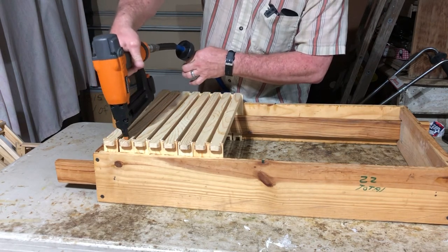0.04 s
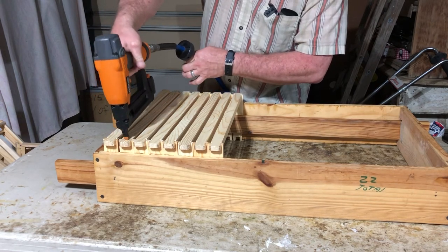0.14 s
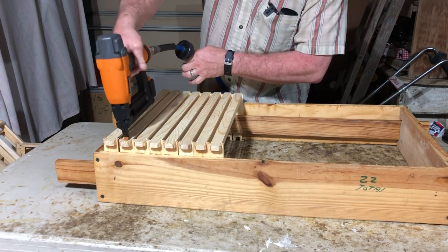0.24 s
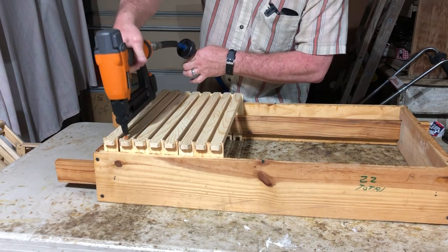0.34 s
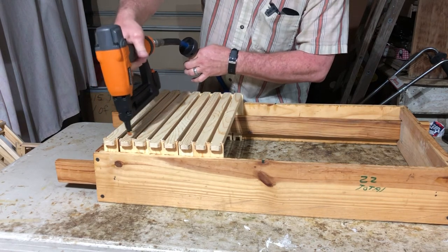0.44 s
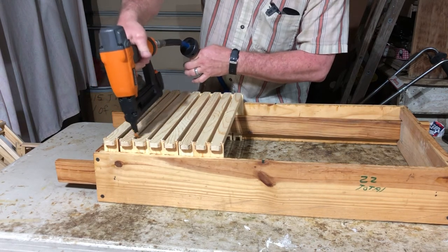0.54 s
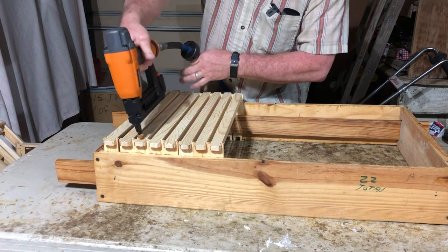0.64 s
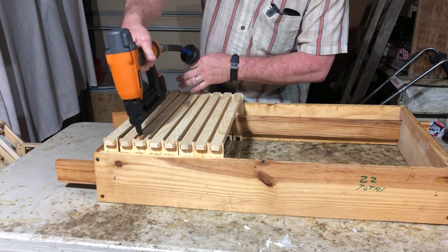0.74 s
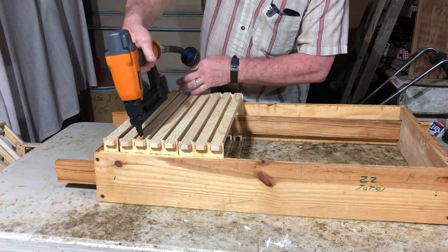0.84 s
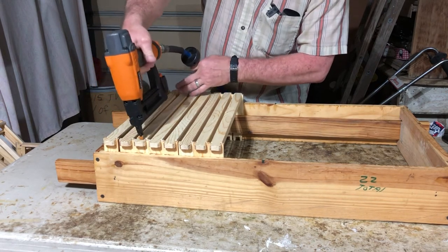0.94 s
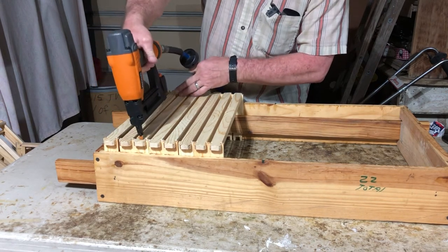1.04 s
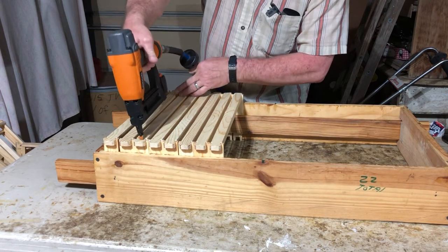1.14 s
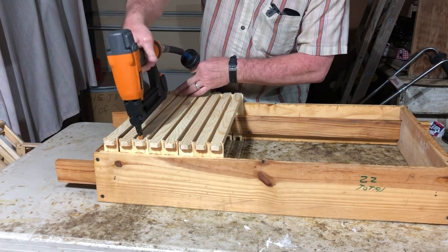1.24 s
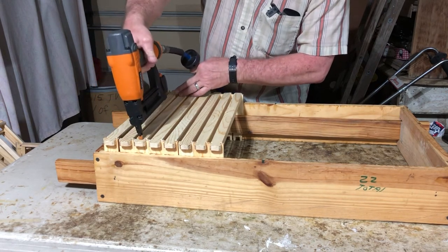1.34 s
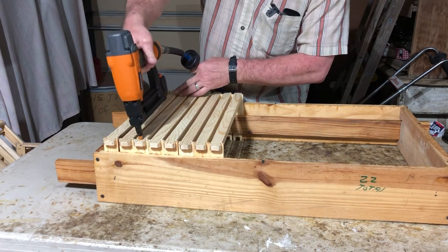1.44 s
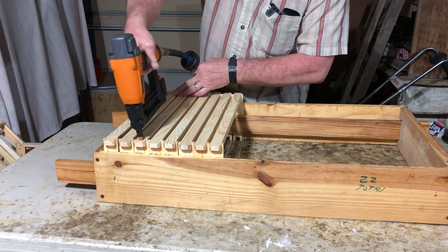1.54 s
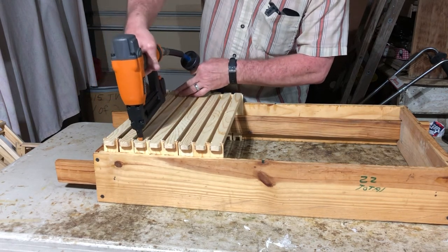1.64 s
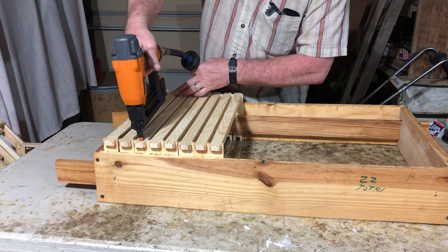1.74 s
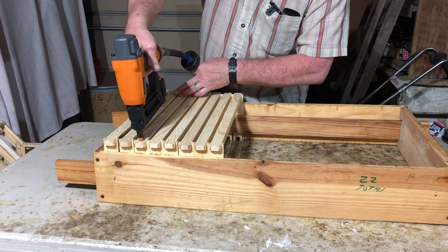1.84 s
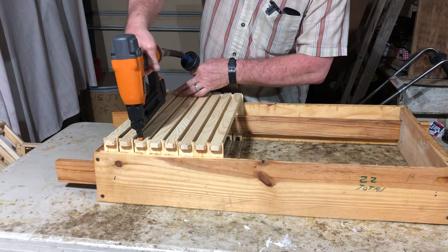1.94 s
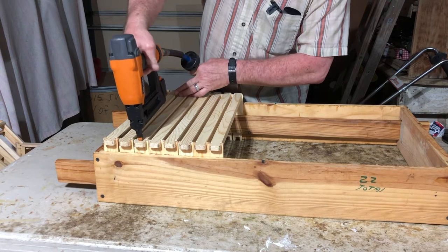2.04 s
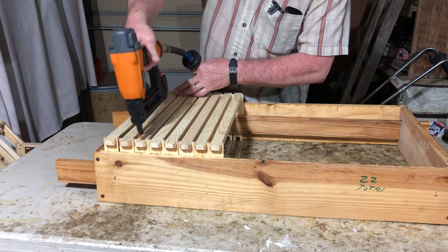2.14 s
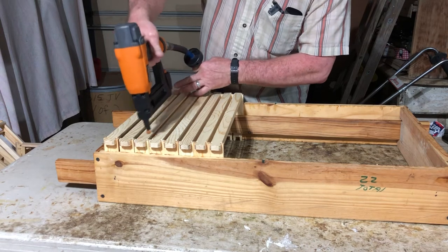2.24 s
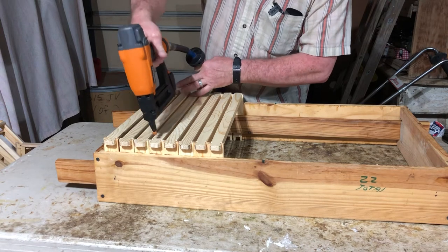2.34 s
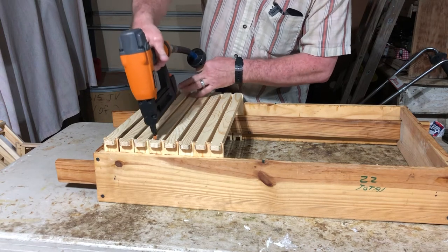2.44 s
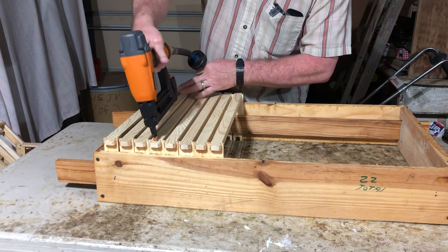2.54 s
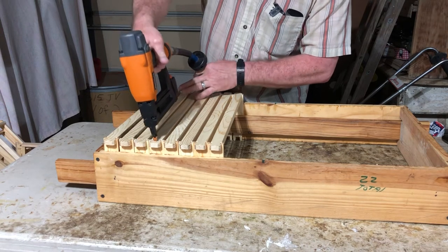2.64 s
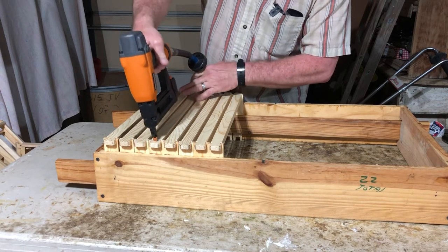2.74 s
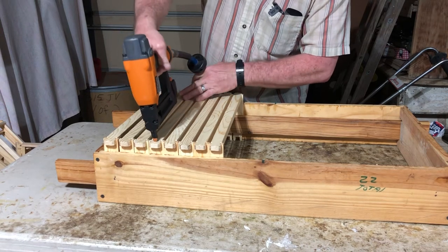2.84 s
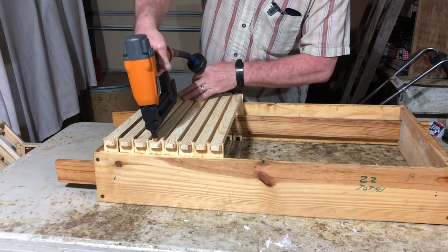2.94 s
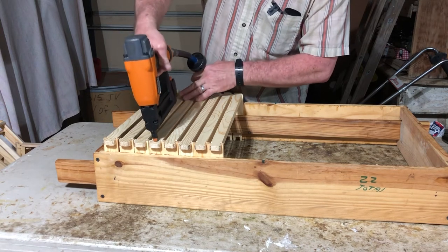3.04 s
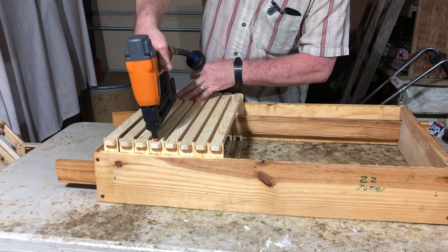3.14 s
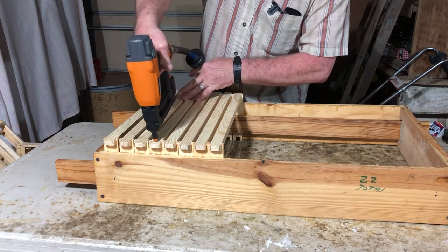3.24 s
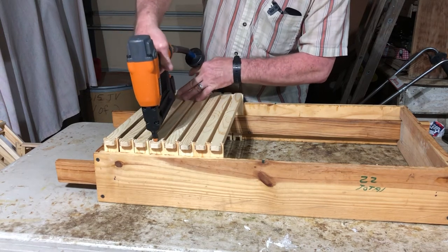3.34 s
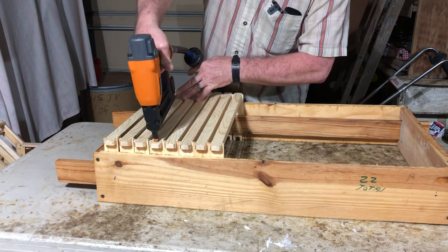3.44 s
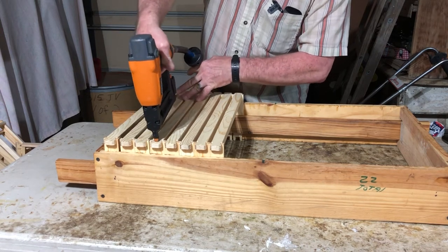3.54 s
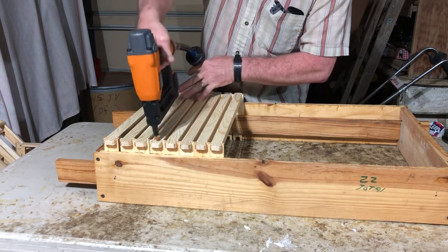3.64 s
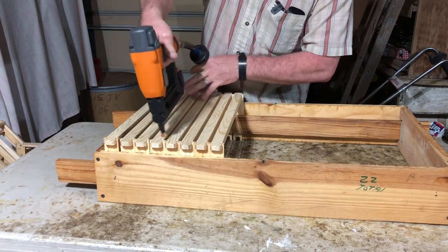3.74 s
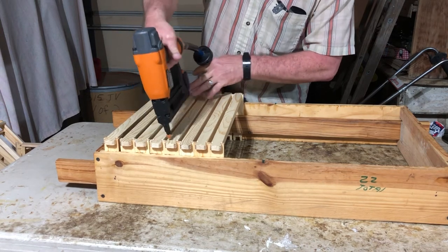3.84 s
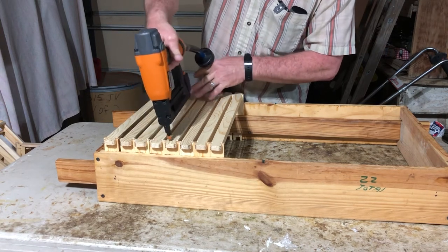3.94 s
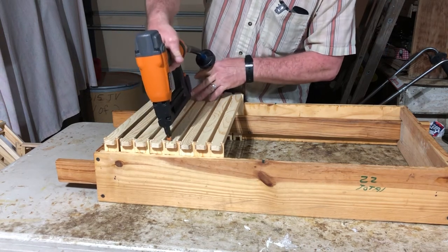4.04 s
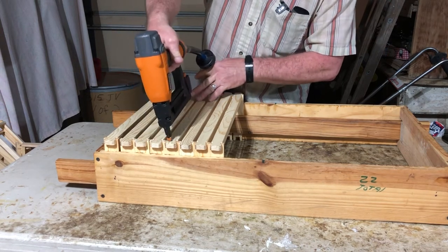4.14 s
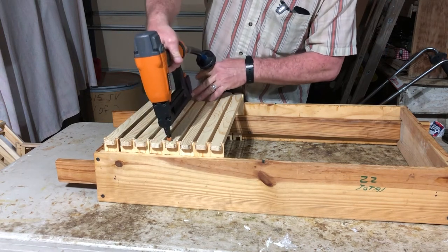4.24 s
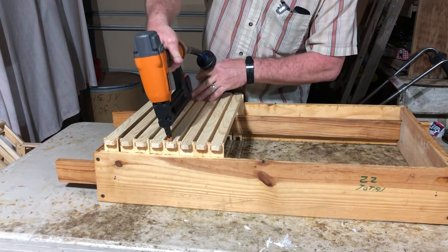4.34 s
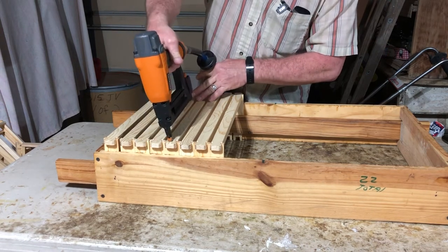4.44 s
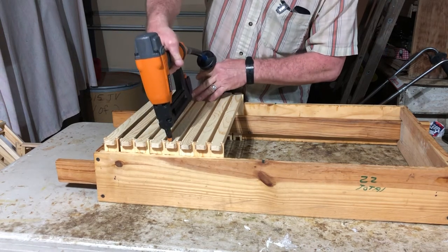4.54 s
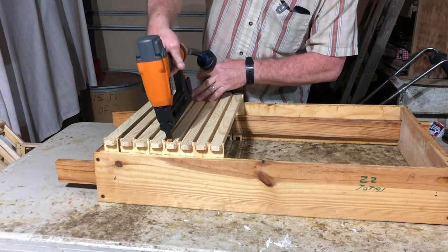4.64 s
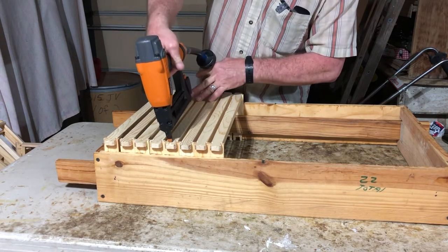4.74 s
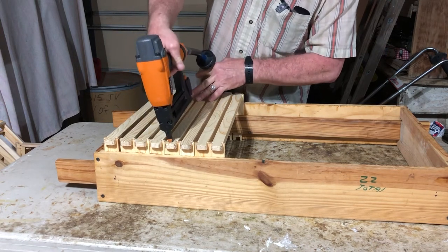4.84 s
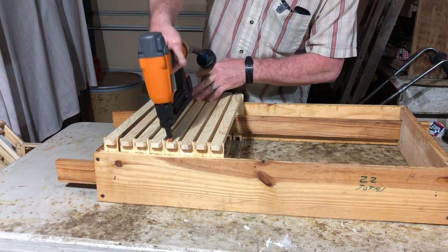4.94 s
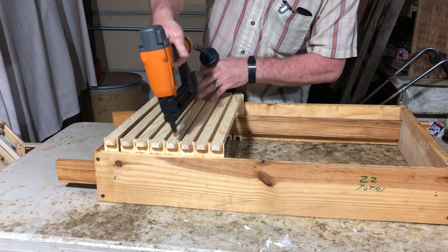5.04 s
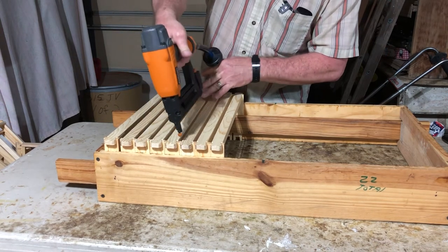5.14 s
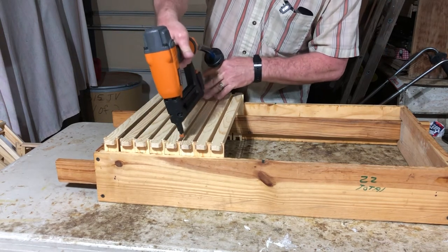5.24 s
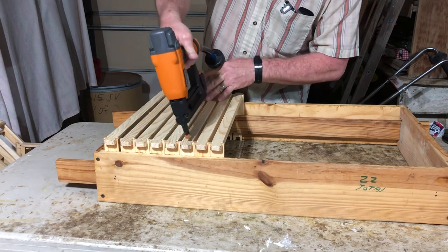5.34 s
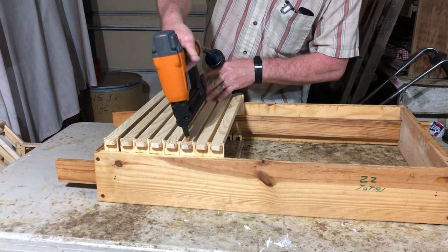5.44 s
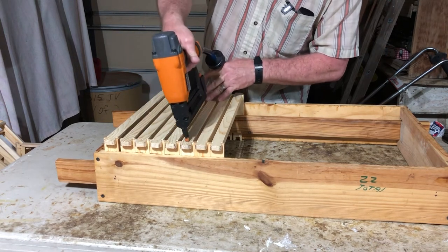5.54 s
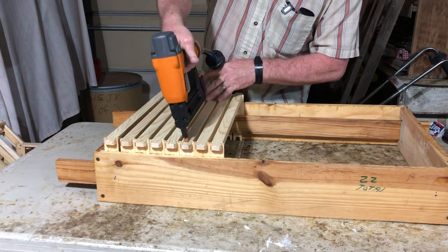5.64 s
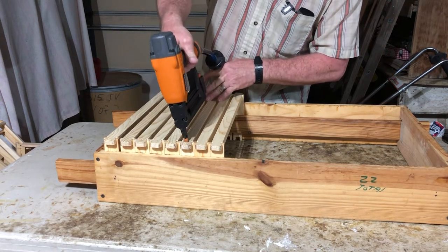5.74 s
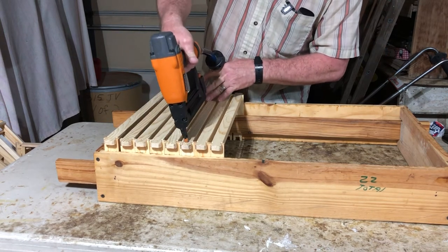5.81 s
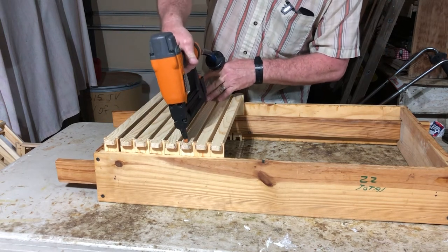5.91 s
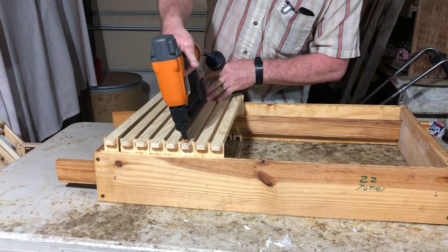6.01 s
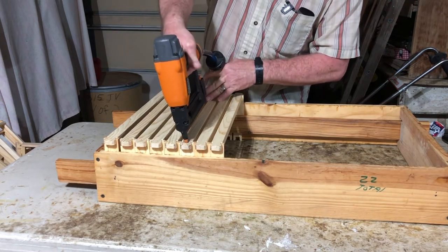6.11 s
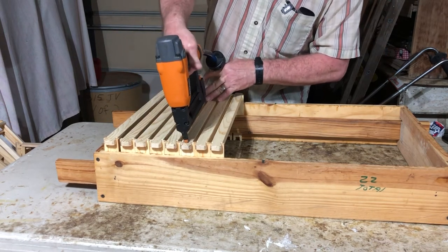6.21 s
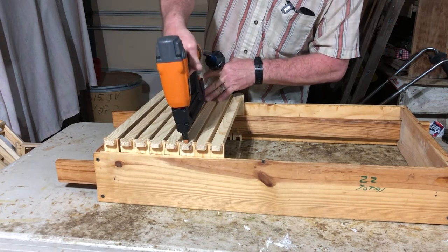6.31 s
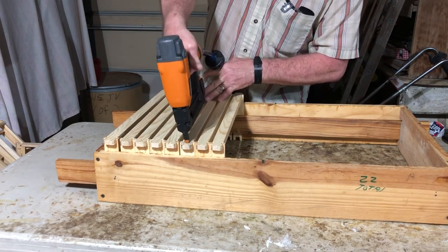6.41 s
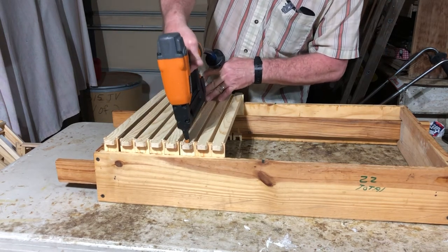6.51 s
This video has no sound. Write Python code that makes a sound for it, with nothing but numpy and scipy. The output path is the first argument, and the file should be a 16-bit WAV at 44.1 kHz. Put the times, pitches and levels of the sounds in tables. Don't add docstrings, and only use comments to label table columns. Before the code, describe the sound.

In a garage workshop, a pneumatic stapler fires five times into wooden frames, roughly every one and a half seconds. Each shot is a light safety click, a short air hiss, a hard woody slam with steel crack and vented air, then a sharp trigger snap. Nose taps and scuffs fill the gaps over faint hum. The close microphone overloads on the blows.

```python
import sys
import numpy as np
from scipy import signal
from scipy.fft import rfft, irfft, next_fast_len
from scipy.io import wavfile
from scipy.ndimage import uniform_filter1d, map_coordinates

SR = 44100
rng = np.random.default_rng(int(sys.argv[2]) if len(sys.argv) > 2 else 0)


def bounce(signal):
    frames = np.transpose(np.atleast_2d(signal))
    limited = np.clip(frames, -1, 1)
    pcm = np.round(limited * 32767).astype(np.int16)
    wavfile.write(sys.argv[1], SR, pcm)


def ratio_of_db(decibels):
    return 10 ** (np.asarray(decibels, float) / 20)


N = 289895

# frequency in Hz, level in dB rms.
HUM = [(60, -79), (120, -67.5), (241, -82), (361, -84), (415, -85)]
# frequency in Hz, density in dB per Hz.
ROOM_TONE = [(25, -19), (60, -1.5), (135, 1.5), (300, -11), (900, -12.5), (2000, -14), (5000, -16.5),
             (7000, -25.5), (14000, -29.5), (16500, -34)]
# frequency in Hz, density in dB per Hz.
BENCH = [(30, -24), (65, 0), (200, -8), (450, -12), (1000, -21), (2000, -59)]
# time in seconds, level in dB.
HANDLING = [(0, -62), (.7, -65), (1.1, -72), (1.55, -61), (2.3, -61), (2.85, -62), (3.2, -74), (4.2, -72),
            (4.6, -64), (5.5, -67), (6, -72), (6.57, -70)]
# start in seconds, frequency in Hz, level in dB, t60 in seconds.
TINKLES = [
    (5.50, 743, -70, 1.4),
    (5.70, 867, -65, .12),
    (5.80, 867, -66, .12),
    (5.93, 867, -72, .12),
    (6.04, 867, -72, .12),
]
# start in seconds, peak in dB, ring in Hz, wood knock in dB.
TAPS = [(0.0034, -43, 1590, 0), (0.7195, -39.5, 3140, -8.5), (0.8007, -44.5, 5980, -30),
        (0.8597, -50.5, 4820, -11.5), (0.9534, -47, 1300, -5.5), (1.2886, -46, 5500, -19),
        (1.4431, -42, 1350, 4), (1.4846, -40, 4440, -5), (1.6785, -49.5, 1900, 5),
        (1.7242, -50.5, 4000, -11.5), (2.4555, -36.5, 4360, -9), (2.5496, -65, 4700, 3),
        (2.6557, -49.5, 3100, -19.5), (2.7731, -44, 2600, 1), (3.1289, -31, 3300, -32),
        (3.312, -62.5, 4150, 2.5), (4.0251, -35, 4210, -11.5), (4.4265, -50, 5380, -2),
        (4.4764, -48, 2560, -1), (4.507, -34.5, 3800, 2), (4.5925, -49, 5400, -14),
        (5.4302, -21, 3664, -15.5), (5.4796, -43, 2800, -8), (5.5611, -38, 5030, -15.5),
        (5.8282, -55.5, 1570, -2), (5.8832, -54, 3600, -2.5), (6.1394, -59, 1790, 5)]
# start in seconds, peak in dB.
SAFETY = [
    (.085, -34),
    (1.756, -36.5),
    (3.340, -47.5),
    (4.704, -48.5),
    (4.723, -33),
    (6.232, -49),
    (6.247, -30.5),
]
# start in seconds, level in dB.
BUMPS = [(.004, -43.5), (.39, -46), (.45, -46), (.72, -56), (1.443, -41.5), (1.486, -41), (1.679, -55),
         (2.07, -41), (2.456, -59.5), (2.776, -41), (4.507, -47), (5.431, -56)]
# frequency in Hz, level in dB, t60 in seconds.
NOSE = [(560, -2, .04), (1350, -6, .025)]
# start in seconds, peak in dB, ring in Hz, first tick in dB.
RELEASES = [
    (0.2839, -12, 3970, -6),
    (2.0691, -3.5, 3845, -14),
    (3.5707, -6, 3970, -9),
    (4.9077, -10, 3884, -10),
    (6.4466, -12, 3820, -6),
]
# start in seconds, peak in dB.
VALVE_OPENINGS = [
    (0.1124, -10.5),
    (1.7879, -9.5),
    (3.3568, -12.5),
    (4.7428, -10),
    (6.2615, -12),
]
# frequency in Hz, density in dB per Hz.
JET = [(59, -51), (100, -18), (676, -11), (1760, -22.5), (2990, -2), (4570, -2.5), (5300, -2), (5650, -0.5),
       (6290, -0.5), (9410, -13), (10900, 0), (16000, -14)]
# start in seconds, peak in dB, vent in dB.
BLOWS = [
    (0.144, -5, -17.5),
    (1.832, -6, -18.5),
    (3.386, -6.5, -10.5),
    (4.774, -7.5, -15),
    (6.29, -5, -17),
]
SHAKE_DB = [
    -6,
    -6,
    6,
    9,
    0,
]
# frequency in Hz, density in dB per Hz.
SLAM = [(25, -44), (45, -23.5), (65, -9), (115, -12), (189, 3), (486, 3.5), (900, -0.5), (1100, -5),
        (3000, -7.5), (5740, -15), (10000, -30), (16000, -33)]
# frequency in Hz, density in dB per Hz.
CRACK = [(800, -16.5), (2500, -3), (5000, 2), (9000, -6.5), (16000, -15)]
# frequency in Hz, density in dB per Hz.
VENT = [(1500, -27.5), (4000, 0), (8000, -5.5), (13000, 3), (17000, -7)]
# frequency in Hz, level in dB, t60 in seconds.
FRAMES = [(69.6, -11.5, 0.16), (159.9, -4, 0.24), (183.75, -2, 0.32), (255.3, -1, 0.17), (315.7, -1, 0.17),
          (366.2, 0.5, 0.24), (614.6, -5, .12), (788, -6, 0.059), (818, -3.5, 0.19), (900, -10, 0.09),
          (1280, -10, 0.09)]
# frequency in Hz, level in dB, t60 in seconds.
STEEL = [(1453, -69, 2.6), (2110, -72, 1.3), (2487, -72, 1.6), (3784, -71, 1.8), (4660, -78, 2.2)]
# frequency in Hz, t60 in seconds.
GARAGE = [(60, 0.28), (150, 0.48), (400, .3), (1500, 0.36), (4000, 0.37), (12000, 0.34)]
# frequency in Hz, t60 in seconds.
LOFT = [(100, 0.32), (1000, 1.1), (4000, 1.1), (9000, 0.61)]

ROOM_TONE_DB = -73
AFTERSHAKE_DB, AFTERSHAKE_T60_S = -42.5, 1.2
SAFETY_HZ, SAFETY_KNOCK_DB = 4620, -14.5
SCUFF_DB = -24
TICK_LEAD_S = 0.0064
HISS_T60_S = 0.17
PUFF_HZ, PUFF_DB, PUFF_T60_S = 186, -14.5, 0.027
CRACK_DB, RETURN_S = 19, 0.052
STEADY_S = 99
TOP_HZ = 16500


def rms(z):
    return np.sqrt(np.mean(np.abs(z) ** 2))


def unit(x):
    return x / np.sqrt(np.mean(x ** 2) + 1e-20)


def along(points, hz):
    f, v = np.transpose(points)
    return np.interp(np.log(hz + 1), np.log(f + 1), v)


def noise(spectrum, size):
    m = next_fast_len(size + 4096)
    gain = ratio_of_db(along(spectrum, np.fft.rfftfreq(m, 1 / SR)))
    white = rfft(rng.standard_normal(m))
    return unit(irfft(white * gain, m)[:size])


def wobble(rate_hz):
    knots = rng.standard_normal(int(N * rate_hz / SR) + 4)
    return map_coordinates(knots, [np.arange(N) * rate_hz / SR])


def fade(t, t60_s, rise_s):
    t = np.maximum(t, 0)
    return (1 - np.exp(-t / rise_s)) * ratio_of_db(-60 * t / t60_s)


def ring(modes, t, scatter_db):
    out = np.zeros(len(t))
    for hz, db, t60_s in modes:
        level = ratio_of_db(db + rng.normal(0, scatter_db) - 60 * t / t60_s)
        out += level * np.sin(2 * np.pi * (hz * t + rng.random()))
    return out


def add(track, s, x):
    track[round(s * SR):][:len(x)] += x


def background():
    t = np.arange(N) / SR
    hum = np.zeros(N)
    for hz, db in HUM:
        level = np.sqrt(2) * ratio_of_db(db + 0.74 * wobble(2))
        hum += level * np.sin(2 * np.pi * hz * t + 0.36 * wobble(7.5))
    stir = ratio_of_db(np.interp(t, *np.transpose(HANDLING)))
    for s, *_ in BLOWS:
        stir = stir + ratio_of_db(AFTERSHAKE_DB) * fade(t - s, AFTERSHAKE_T60_S, .03)
    rumble = stir * ratio_of_db(-4.5 + 3.8 * wobble(12)) * noise(BENCH, N)
    room_tone = ratio_of_db(ROOM_TONE_DB + wobble(3)) * noise(ROOM_TONE, N)
    return hum + rumble + room_tone


def tinkles():
    out, t = np.zeros(N + SR), np.arange(SR) / SR
    for s, hz, db, t60_s in TINKLES:
        add(out, s, ratio_of_db(db) * np.sin(2 * np.pi * hz * t) * fade(t, t60_s, .008))
    return out[:N]


def snap(t, hz, t60_s, wide_db):
    colour = [(0.16 * hz, wide_db - 22.5), (0.67 * hz, wide_db), (hz, 0),
              (1.6 * hz, wide_db), (3 * hz, wide_db - 13.0), (7 * hz, wide_db - 43.5)]
    modes = [(hz, -2, 1.1 * t60_s)]
    for ratio in np.exp(rng.normal(0, .25, size=3)):
        modes.append((hz * ratio, -13, 1.2 * t60_s))
    burst = noise(colour, len(t)) * fade(t, t60_s, 0.00021)
    return burst + ring(modes, t, scatter_db=4.5) * fade(t, STEADY_S, 0.00026)


def taps():
    out, t = np.zeros(N + SR), np.arange(SR // 3) / SR
    knock_colour = [(100, -19), (200, 5.5), (550, -4), (1000, -19), (3000, -42), (8000, -70)]
    scuff_colour = [(300, 3.5), (4000, 4.0), (8000, -15.5), (16000, -39)]
    thump_colour = [(30, -24), (65, 1.5), (110, -9.5), (250, -22), (700, -45), (4000, -90)]
    safety = [(s, db, SAFETY_HZ, SAFETY_KNOCK_DB) for s, db in SAFETY]
    for s, db, hz, knock_db in list(TAPS) + safety:
        tick = snap(t, hz, 0.012, wide_db=-5)
        nose = ratio_of_db(.6 * knock_db) * ring(NOSE, t, scatter_db=3) * fade(t, STEADY_S, .001)
        knock = ratio_of_db(knock_db + 0.5) * noise(knock_colour, len(t)) * fade(t, .14, 0.002)
        scuff = ratio_of_db(SCUFF_DB) * noise(scuff_colour, len(t)) * fade(t, 0.3, 0.0067)
        add(out, s, ratio_of_db(db - 4.5) * (tick + nose + scuff + knock))
    for s, db in BUMPS:
        add(out, s, ratio_of_db(db) * noise(thump_colour, len(t)) * fade(t, 0.3, 0.014))
    return out[:N]


def trigger():
    out, t = np.zeros(N + SR), np.arange(SR // 10) / SR
    for s, db, hz, tick_db in RELEASES:
        add(out, s, ratio_of_db(db - 1) * snap(t, hz, 0.008, wide_db=-14))
        add(out, s - TICK_LEAD_S, ratio_of_db(db + tick_db) * snap(t, hz, 0.002, wide_db=-10))
    return out[:N]


def valve():
    out, t = np.zeros(N + SR), np.arange(SR // 2) / SR
    for (s, db), (blow_s, *_) in zip(VALVE_OPENINGS, BLOWS):
        opening = fade(t, HISS_T60_S, 0.0017) * fade(t, STEADY_S, 0.0017)
        cutoff = ratio_of_db(-60 * np.maximum(t + s - blow_s, 0) / .05)
        jet = noise(JET, len(t)) * opening * cutoff
        puff = ratio_of_db(PUFF_DB) * np.sin(2 * np.pi * PUFF_HZ * t) * fade(t, PUFF_T60_S, 0.0022)
        add(out, s - .004, ratio_of_db(db - 7.5) * jet + ratio_of_db(db) * puff)
    return out[:N]


def blows():
    near, rings, t = np.zeros(N + 2 * SR), np.zeros(N + 2 * SR), np.arange(SR) / SR
    return_colour = [(2500, -30.5), (4200, -4), (6500, -23.0)]
    for (s, db, vent_db), shake_db in zip(BLOWS, SHAKE_DB):
        thud = ratio_of_db(18) * noise(SLAM, len(t)) * fade(t, 0.081, 0.0012)
        crack = ratio_of_db(CRACK_DB) * noise(CRACK, len(t)) * fade(t - .0035, 0.024, 0.0016)
        vent = ratio_of_db(vent_db + 8.0) * noise(VENT, len(t)) * fade(t - .015, 0.053, 0.0085)
        back = ratio_of_db(-4) * noise(return_colour, len(t)) * fade(t - RETURN_S, 0.034, 0.00069)
        add(near, s - .001, ratio_of_db(db - 6) * (thud + crack + vent + back))
        wood = ring(FRAMES, t, scatter_db=0.0) * fade(t, STEADY_S, 0.0033)
        add(rings, s - .001, ratio_of_db(db - 0.5) * wood)
        low_steel = ratio_of_db(shake_db) * ring(STEEL[:2], t, scatter_db=1)
        high_steel = ratio_of_db(6) * ring(STEEL[2:], t, scatter_db=3)
        add(rings, s, (low_steel + high_steel) * (1 - t ** 4))
    return near[:N], rings[:N]


def walls(x):
    hop = 64
    grid = dict(fs=SR, nperseg=256, noverlap=256 - hop)
    hz, _, z = signal.stft(x, **grid)
    power = uniform_filter1d(np.abs(z) ** 2, size=3, axis=0)
    garage_keep = ratio_of_db(-120 * hop / SR / along(GARAGE, hz))
    loft_keep = ratio_of_db(-120 * hop / SR / along(LOFT, hz))

    def hold(keep, p):
        return signal.lfilter([0, 0, 1 - keep], [1, -keep], p)

    linger = np.array([hold(k, p) + ratio_of_db(-63) * hold(g, p)
                       for k, g, p in zip(garage_keep, loft_keep, power)])
    diffuse = signal.stft(rng.standard_normal(len(x)), **grid)[2]
    tail = np.sqrt(np.abs(linger)) * diffuse / rms(diffuse)
    return signal.istft(tail, **grid)[1][:len(x)]


def scene():
    slam, rings = blows()
    air, click, touch = valve(), trigger(), taps()
    echo = walls(ratio_of_db(-4.0) * slam + ratio_of_db(-9.5) * air + ratio_of_db(-11) * click + ratio_of_db(-9.0) * touch)
    return (slam + rings + air + click + touch + echo + tinkles() + background())[None]


def band_limit(x):
    return signal.sosfilt(signal.butter(12, 16960, fs=SR, output="sos"), x)


def record(dry):
    x = dry / (1 + np.abs(dry / .72) ** 6) ** (1 / 6)
    keep = np.exp(-1 / (0.0032 * SR))
    load = signal.lfilter([1 - keep], [1, -keep], x ** 2)
    x = 1.083 * x / (1 + 0.87 * load)
    x = signal.lfilter(*signal.butter(2, 50 / (SR / 2), "high"), x)
    x = x / (1 + np.abs(x / .88) ** 10) ** (1 / 10)
    x = signal.sosfilt(signal.cheby2(12, 50, TOP_HZ / (SR / 2), output="sos"), x)
    return band_limit(x)


dry = scene()
out = record(dry)
bounce(out)
```